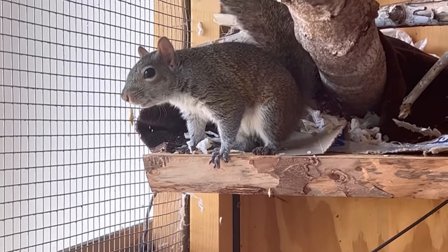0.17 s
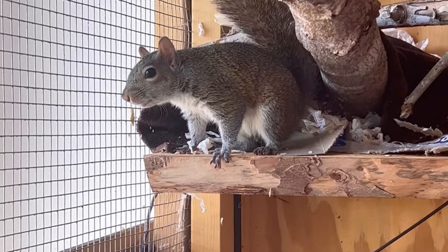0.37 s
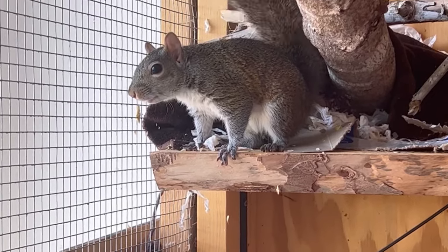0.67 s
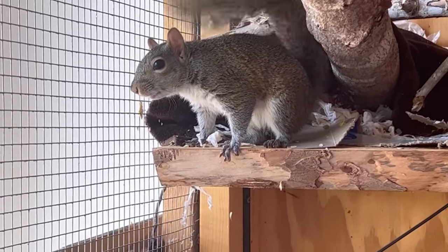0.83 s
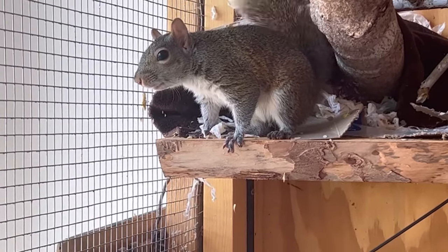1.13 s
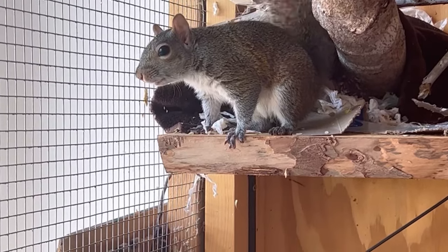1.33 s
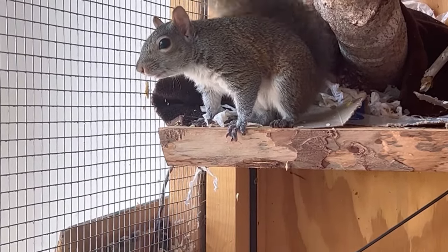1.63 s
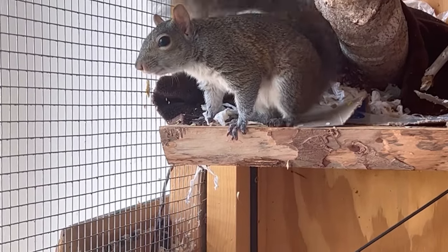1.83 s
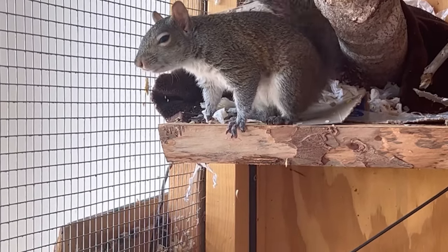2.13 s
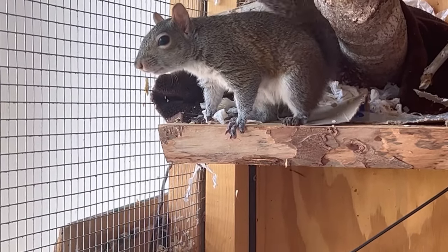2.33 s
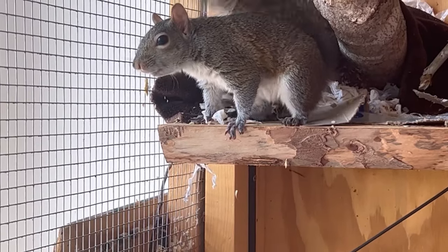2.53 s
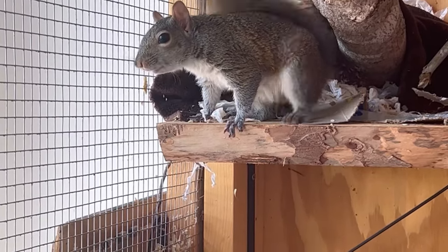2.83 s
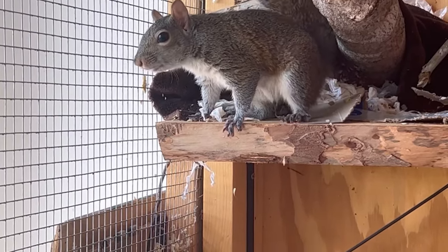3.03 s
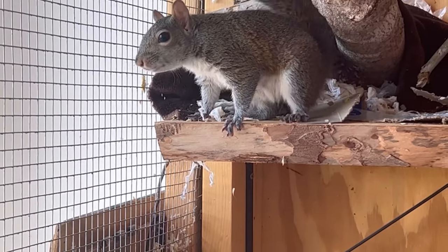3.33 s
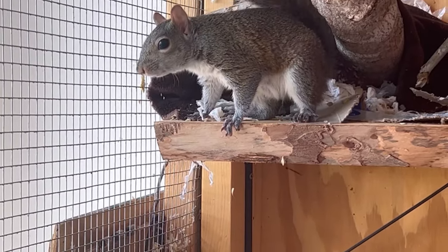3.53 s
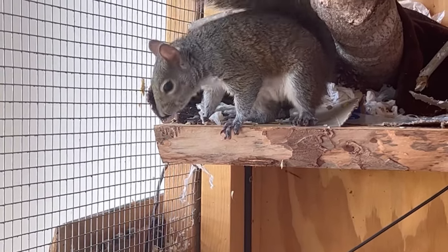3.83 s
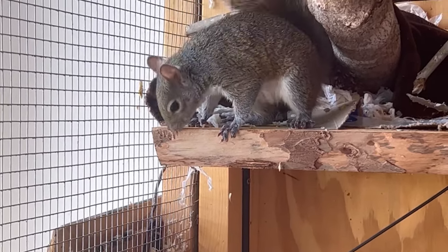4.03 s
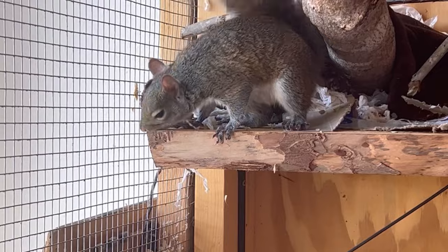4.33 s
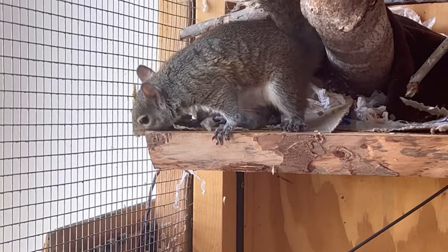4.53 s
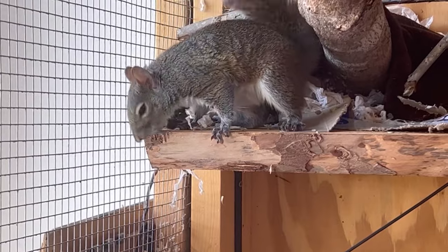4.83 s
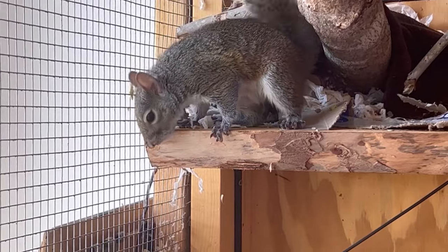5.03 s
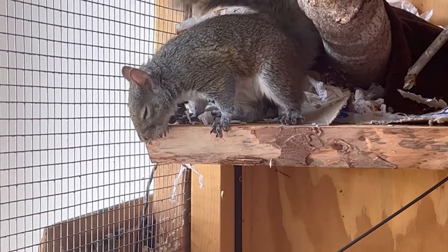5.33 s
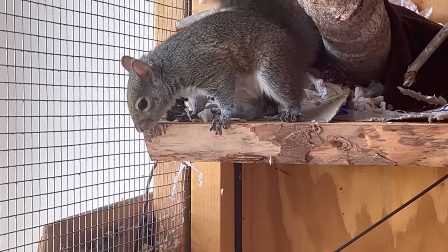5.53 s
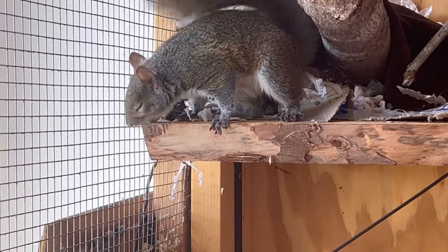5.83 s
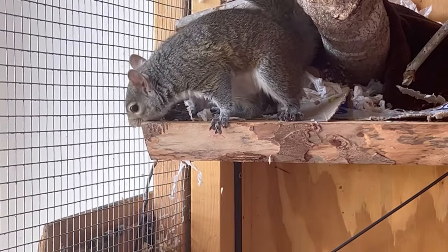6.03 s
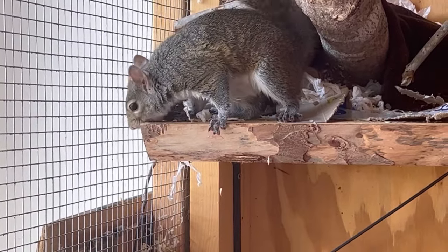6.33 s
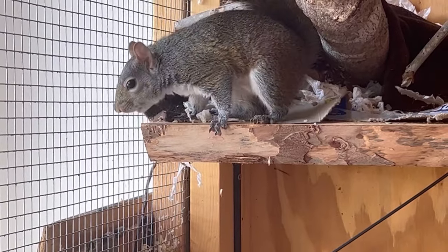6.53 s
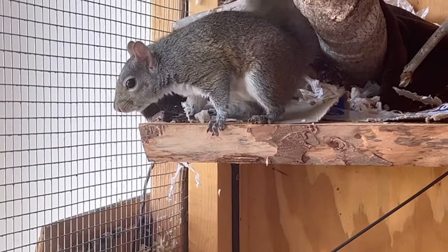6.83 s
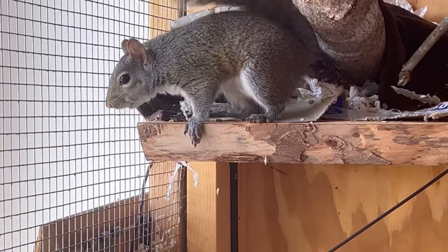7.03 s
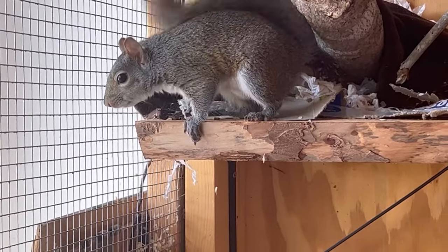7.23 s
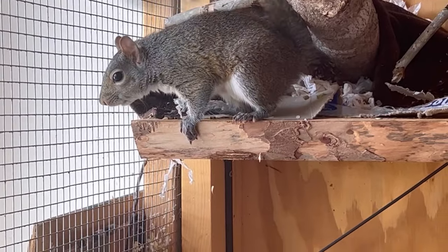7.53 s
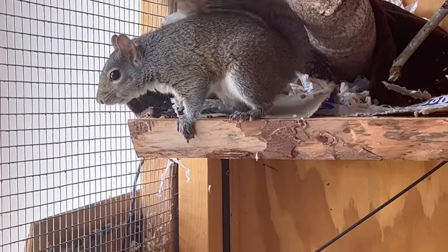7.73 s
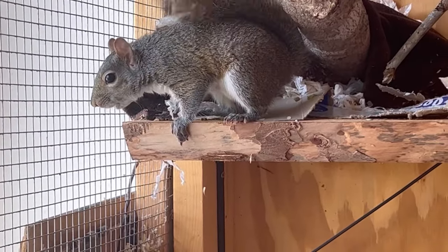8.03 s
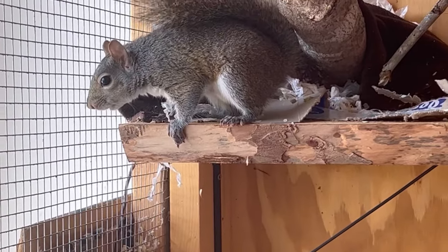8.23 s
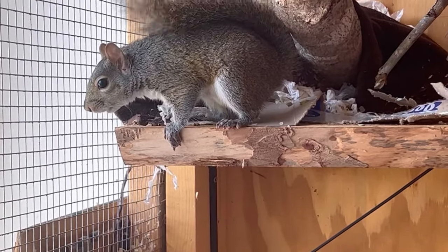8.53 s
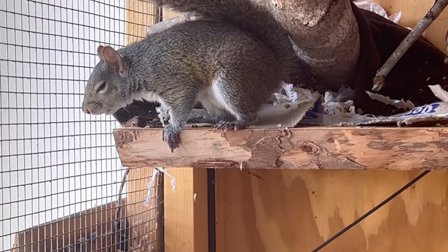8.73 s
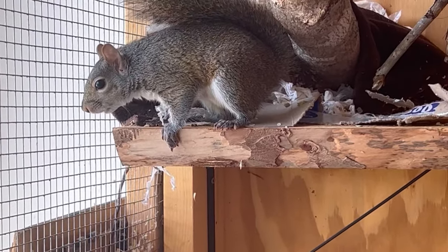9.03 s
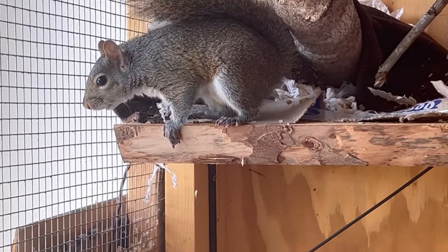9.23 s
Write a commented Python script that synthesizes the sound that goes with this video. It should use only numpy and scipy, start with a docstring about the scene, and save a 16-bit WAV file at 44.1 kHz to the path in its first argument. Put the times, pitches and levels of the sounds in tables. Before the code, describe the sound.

Short raspy squirrel barks at a steady pace, then sparser ones and a harsh hissing screech, with stuttering sniffs and faint rustling in a wooden enclosure.

```python
"""A squirrel on a wooden shelf in a wire enclosure, close to two microphone ports.
It gives ten quick hoarse barks, four spaced ones and a longer rising screech: trembling tones and
fluttering turbulence. Around them it stutters soft nasal puffs, shifts its claws and paws on the plank
and rustles its bedding, all made from short bursts or swells of shaped noise.
The enclosure adds echoes, a woody ring and a tail; a low wavering hum and faint air lie under everything."""
import sys
import numpy as np
from scipy import signal
from scipy.fft import rfft, irfft, next_fast_len
from scipy.io import wavfile
from scipy.ndimage import map_coordinates

SR = 44100
rng = np.random.default_rng(int(sys.argv[2]) if len(sys.argv) > 2 else 0)


def dump_mix(stems):
    """Bounce the given channels to the path in sys.argv[1] as a 16-bit WAV at rate SR."""
    frames = np.atleast_2d(stems).T  # one column per channel
    limited = np.clip(frames, -1, 1)  # hard clip at full scale
    pcm = np.round(limited * 32767).astype(np.int16)
    wavfile.write(sys.argv[1], SR, pcm)


N = 413658


def amp(db):
    """Decibels to gain."""
    return 10 ** (np.asarray(db) / 20)


def evened(x):
    """Scales to rms 1."""
    return x / np.sqrt(np.mean(x ** 2) + 1e-20)


def read(points, hz):
    """Reads a table of (Hz, value) on a log-frequency axis."""
    f, value = np.transpose(points)
    return np.interp(np.log(hz + 1), np.log(f + 1), value)


def add(mix, s, sound):
    """Mixes a sound in at time s."""
    part = mix[max(round(s * SR), 0):][:len(sound)]
    part += sound[:len(part)]


def colour(x, spectrum):
    """Filters by a spectrum in dB."""
    n = x.shape[-1]
    size = next_fast_len(n)
    gain = amp(read(spectrum, np.fft.rfftfreq(size, 1 / SR)))
    return irfft(rfft(x, size) * gain, size)[..., :n]


def noise(spectrum, n):
    """Turbulence of rms 1 with the given spectrum."""
    return evened(colour(rng.standard_normal(n), spectrum))


def sliding(spectrum, factor):
    """Turbulence read at a changing speed, so its resonances all slide by a curve of factors."""
    n = len(factor)
    return map_coordinates(noise(spectrum, 2 * n), [np.cumsum(factor)], order=5, mode="wrap")


def varied(spectrum, depth_db):
    """Nose and throat twitch, so their resonances differ from call to call."""
    hz = np.arange(0, SR / 2, 330)
    return np.transpose([hz, read(spectrum, hz) + depth_db * rng.standard_normal(len(hz))])


def envelope(t, onset_db, attack, hold, fall_db):
    """A gain that climbs from onset_db to full over the attack and falls steadily once t passes hold."""
    climb = onset_db * np.maximum(1 - t / attack, 0) ** 2
    fall = fall_db * np.maximum(t - hold, 0)
    return amp(climb - fall)


def wander(n, hz):
    """A smooth random curve of rms 1 whose movement thins out above about hz."""
    size = next_fast_len(n)
    smoothing = np.exp(-(np.fft.rfftfreq(size, 1 / SR) / hz) ** 2)
    return evened(irfft(rfft(rng.standard_normal(size)) * smoothing, size)[:n])


def whistle(hz, jitter, jitter_hz, shimmer, partials):
    """An unsteady throat tone: pitch and strength both tremble."""
    n = len(hz)
    turns = np.cumsum(hz * (1 + jitter * wander(n, jitter_hz))) / SR
    tone = np.zeros(n)
    for factor, db in partials:
        strength = 1 + shimmer * wander(n, jitter_hz)
        tone += amp(db) * evened(np.sin(2 * np.pi * factor * turns) * strength)
    return tone


def flutter(n, rate_hz, depth):
    """Slack folds pulse the air stream at an uneven rate."""
    turns = np.cumsum(rate_hz * (1 + .35 * wander(n, 200))) / SR
    return evened(np.exp(depth * np.cos(2 * np.pi * turns)))


def burst(spectrum, rise, decay):
    """A short swell of turbulence under an envelope that peaks at 1; rise and decay in seconds."""
    t = np.arange(SR // 5) / SR
    shape = (1 - np.exp(-t / rise)) ** 2 * np.exp(-t / max(decay, .001))
    return noise(spectrum, len(t)) * shape / shape.max()


# Spectra of the mouth puff, lip pop, throat rasp and bark hiss.
# Each row: frequency in Hz, relative level in dB.
PUFF_SPECTRUM = [(120, -33.5), (260, -10), (400, -4), (520, -2), (635, -1.5), (760, -2), (1000, 1.5),
                 (1350, -1.5), (1800, -6), (3000, -33), (6000, -56.5)]
LIP_POP_SPECTRUM = [(450, -25), (930, -3), (1150, -5), (1500, -17.5), (3000, -36)]
RASP_SPECTRUM = [(400, -34), (900, -10), (1450, -4.5), (1900, 1), (2250, 1.5), (2620, 2.5), (3300, -5),
                 (4000, -10.5), (4800, -11.5), (7000, -36.5)]
BARK_HISS_SPECTRUM = [(3000, -37.5), (4900, -18.5), (5500, -4.5), (6600, -8.5), (8400, -1), (9200, -7),
                      (9750, -19), (10500, -1), (11900, 7), (13200, 3.5), (14500, -18.5), (16000, -15)]
# Partials of the hoarse voice. Each row: factor on the throat pitch, level in dB.
VOICE_PARTIALS = [(.25, -25), (.49, -23), (.74, -16.5), (1, 0), (1.45, -13), (1.74, -14.5), (1.95, -20)]
# How each part follows effort: dB at effort 0, dB per dB of effort; the edge is the hiss gain from 13 kHz up
VOICE_LAW, PUFF_LAW, POP_LAW = (-29.7, 1.05), (-39.5, 0.31), (-42.2, 0.31)
RASP_LAW, EDGE_LAW = (-35, 0.84), (.5, 0.8)
# Attack and hold are shares of the bark's length, the fall is in dB per length
PUFF_SHAPE = dict(onset_db=-9, attack=0.087, hold=0.76, fall_db=48.5)
VOICE_SHAPE = dict(onset_db=-19, attack=0.47, hold=0.69, fall_db=40.5)
RASP_SHAPE = dict(onset_db=-18, attack=0.78, hold=0.89, fall_db=38.5)
BARK_HISS_SHAPE = dict(onset_db=-7, attack=1.0, hold=0.87, fall_db=52)
PITCH_RISE = .2  # share of the pitch gained over the length of a bark
# The mouth's resonances start high and settle as it opens: factors, and time constant as a share of length
MOUTH_START, MOUTH_OPEN, MOUTH_SETTLE = 1.4, .85, .19


def bark(length, pitch_hz, effort_db, hiss_db):
    """The mouth pops open with a dull puff; the hoarse voice swells and rises, with rasp and hiss over it."""
    t = np.arange(SR // 7) / SR
    n, share = len(t), t / length
    laws = (VOICE_LAW, PUFF_LAW, POP_LAW, RASP_LAW, EDGE_LAW)
    voice_db, puff_db, pop_db, rasp_db, edge_db = (db + slope * effort_db for db, slope in laws)
    glide = 1 + PITCH_RISE * (share - .5)
    mouth = MOUTH_OPEN + (MOUTH_START - MOUTH_OPEN) * np.exp(-share / MOUTH_SETTLE)

    puff = amp(puff_db) * envelope(share, **PUFF_SHAPE) * sliding(PUFF_SPECTRUM, mouth)
    pop = amp(pop_db) * burst(LIP_POP_SPECTRUM, rise=0.0022, decay=0.0059)[:n]
    # the throat never shapes two barks alike
    throat = sliding(varied(RASP_SPECTRUM, depth_db=4.5), glide ** 1.4)
    rasp = amp(rasp_db) * envelope(share, **RASP_SHAPE) * throat
    # the highest hiss fades in the weaker barks
    fizz = colour(sliding(varied(BARK_HISS_SPECTRUM, depth_db=2), mouth ** 0.1), [(9500, 0), (13000, edge_db)])
    hiss = amp(hiss_db) * envelope(share, **BARK_HISS_SHAPE) * fizz
    tone = whistle(pitch_hz * glide, jitter=.03, jitter_hz=330, shimmer=0.52, partials=VOICE_PARTIALS)
    voice = amp(voice_db) * envelope(share, **VOICE_SHAPE) * tone

    breath = (puff + rasp + hiss) * flutter(n, rate_hz=330, depth=0.32)
    soft_start = 1 - np.exp(-t / 0.0008)
    return pop + (breath + voice) * soft_start


# Spectrum of the screech's hiss. Each row: frequency in Hz, relative level in dB.
SCREECH_HISS_SPECTRUM = [(3000, -33), (3900, -11), (4450, -8), (4950, -13), (5330, 3.5), (5550, -3.5),
                         (5850, 7), (6200, -2.5), (6800, 0), (7700, -6.5), (9500, -13), (10800, 0),
                         (11800, -2), (13000, -24), (16000, -31.5)]
# Pitch path of the screech. Each row: scene time in seconds, lower whistle in Hz, upper whistle in Hz.
SCREECH_PITCH_PATH = [(7.895, 1441, 2050), (7.926, 1315, 1990), (7.993, 1465, 2125), (8.014, 1606, 2297),
                      (8.056, 1770, 2320), (8.085, 1872, 2665)]
SCREECH_S, SCREECH_LENGTH_S, SCREECH_CLOSE_S = 7.895, .205, 0.016
# Levels before the envelopes
SCREECH_RASP_DB, SCREECH_HISS_DB, LOW_WHISTLE_DB, HIGH_WHISTLE_DB = -40, -29, -40, -30
# Attack and hold in seconds, the fall in dB per second
SCREECH_RASP_SHAPE = dict(onset_db=-19.5, attack=.045, hold=0.094, fall_db=88)
SCREECH_HISS_SHAPE = dict(onset_db=-33, attack=0.052, hold=.132, fall_db=306.5)
LOW_WHISTLE_SHAPE = dict(onset_db=-12.5, attack=.06, hold=0.087, fall_db=229.5)
HIGH_WHISTLE_SHAPE = dict(onset_db=-29, attack=.108, hold=0.14, fall_db=286.5)


def screech():
    """Two rising whistles, made hoarse by fluttering folds, in a strong hiss; the upper whistle takes over."""
    t = np.arange(SR // 4) / SR
    n = len(t)
    s, *pitches = np.transpose(SCREECH_PITCH_PATH)
    low_hz, high_hz = (np.interp(SCREECH_S + t, s, hz) for hz in pitches)

    throat = noise(RASP_SPECTRUM, n) + amp(-7.5) * noise(PUFF_SPECTRUM, n)
    rasp = amp(SCREECH_RASP_DB) * envelope(t, **SCREECH_RASP_SHAPE) * throat
    hiss = amp(SCREECH_HISS_DB) * envelope(t, **SCREECH_HISS_SHAPE) * noise(SCREECH_HISS_SPECTRUM, n)
    tones = np.zeros(n)
    for hz, db, shape in [(low_hz, LOW_WHISTLE_DB, LOW_WHISTLE_SHAPE),
                          (high_hz, HIGH_WHISTLE_DB, HIGH_WHISTLE_SHAPE)]:
        tone = whistle(hz, jitter=0.014, jitter_hz=247, shimmer=.35, partials=[(1, 0), (2, -21.5)])
        tones += amp(db) * envelope(t, **shape) * tone

    hoarse = tones * flutter(n, rate_hz=250, depth=0.16)
    breath = (rasp + hiss) * flutter(n, rate_hz=110, depth=0.23)
    closing = np.clip((SCREECH_LENGTH_S - t) / SCREECH_CLOSE_S, 0, 1)
    return (breath + hoarse) * closing


# Spectra of the nostril hiss and the low push. Each row: frequency in Hz, relative level in dB.
NOSTRIL_SPECTRUM = [(1200, -17), (2500, -13.5), (3800, 3.5), (4900, -4), (5800, -1), (7000, -8),
                    (8400, 1.5), (9800, -17), (11900, 13.5), (13300, -5.5), (16000, -13.5)]
LOW_PUSH_SPECTRUM = [(120, -18.5), (260, 0.5), (400, 3), (560, 1), (680, -9.5), (1000, -5), (1700, -20),
                     (3000, -23), (6000, -44)]
# Bouts of nasal puffs. Each row: first puff in seconds, number of puffs, period in seconds,
# mid-bout hiss in dB, mid-bout low push in dB, growth over the bout in dB, decay of the hiss in seconds.
PUFF_BOUTS = [(0.0263, 6, 0.04, -47.5, -50.5, -9.5, 0.005), (0.653, 5, 0.035, -51, -55, -1, 0.0042),
              (0.8339, 4, .0398, -54.5, -61, 4, 0.011), (4.655, 7, 0.032, -56.5, -56, 11.5, 0.0076),
              (4.907, 4, 0.034, -54.5, -52.5, 6, 0.0082), (5.1132, 4, 0.037, -60, -56.5, 1.5, .007),
              (5.334, 5, 0.042, -58, -55, -1, .0075), (7.7502, 4, .042, -43.5, -43, 4, 0.0093),
              (8.4426, 6, 0.037, -51, -55, -5.5, 0.012), (8.732, 4, 0.037, -52.5, -58.5, 9.5, 0.0095),
              (9.3253, 2, 0.037, -51, -48, 9, 0.0072)]
ARCH_DB, LOW_PUSH_SHARE = 7, 0.93  # weakening towards a bout's ends; share of force the low push follows


def puffs():
    """Evenly paced bouts, arched and leaning in force: nostril hiss over a soft low push of air."""
    out = np.zeros(N)
    for start, count, period, hiss_db, low_db, growth_db, decay in PUFF_BOUTS:
        for k in range(round(count)):
            from_middle = (k + .5) / round(count) - .5
            force_db = growth_db * from_middle - ARCH_DB * (2 * from_middle) ** 2
            nostrils = burst(varied(NOSTRIL_SPECTRUM, depth_db=6.5), rise=0.0011, decay=decay)
            hiss = amp(hiss_db + force_db) * nostrils
            low = burst(LOW_PUSH_SPECTRUM, rise=0.0014, decay=decay + 0.002)
            push = amp(low_db + LOW_PUSH_SHARE * force_db) * low
            add(out, start + k * period, hiss + push)
    return out


# Spectra of claws and of the plank. Each row: frequency in Hz, relative level in dB.
CLAW_SPECTRUM = [(300, -17), (1200, -13.5), (3000, -12.5), (6000, -8), (9500, -2), (12000, 1), (16000, 2)]
PLANK_SPECTRUM = [(70, -10.5), (165, 8), (210, -6), (265, 12), (350, -5), (450, -8), (700, -10.5),
                  (1500, -25.5), (4000, -35), (9000, -54.5)]
# Claws on wood and wire. Each row: start in seconds, reference level in dB, decay of the scrape in seconds.
CLAW_HITS = [(2.3714, -46.5, .005), (2.4047, -39, 0.0076), (2.5023, -50.5, .005), (3.095, -46, 0.0083),
             (6.197, -55, .005), (6.288, -57.5, .005), (6.417, -55.5, .009), (6.9345, -37, 0.021),
             (7.541, -42, 0.011), (7.568, -29, 0.016), (7.651, -45, 0.025)]
# Paws bumping the plank. Each row: start in seconds, level in dB, decay in seconds.
PAW_BUMPS = [(4.446, -54.5, 0.011), (4.483, -57.5, 0.017), (5.836, -50.5, 0.017), (5.872, -56, 0.011),
             (6.238, -53, 0.037), (6.27, -53, 0.021), (6.346, -51, 0.037), (6.419, -43, 0.02),
             (7.568, -58.5, 0.061), (7.791, -57, 0.011)]


def feet():
    """Claws snap and scrape briefly; paws thud on the shelf."""
    out = np.zeros(N)
    for s, db, decay in CLAW_HITS:
        snap = amp(db + 3.5) * burst(CLAW_SPECTRUM, rise=.0001, decay=0.00071)
        scrape = amp(db - 8.0) * burst(CLAW_SPECTRUM, rise=0.00067, decay=decay)
        add(out, s, snap + scrape)
    for s, db, decay in PAW_BUMPS:
        add(out, s, amp(db) * burst(PLANK_SPECTRUM, rise=0.0024, decay=decay))
    return out


# Spectrum of the rustle. Each row: frequency in Hz, relative level in dB.
BEDDING_SPECTRUM = [(90, -21), (160, 4), (280, 6), (450, -9.5), (800, -17.5), (1600, -25), (4000, -37.5)]
# The squirrel leans. Each row: loudest moment in seconds, half length in seconds, level in dB.
LEAN_SWELLS = [(0.027, 0.19, -57.5), (.77, 0.22, -62), (4.77, 0.19, -59), (5.417, 0.29, -65),
               (5.88, .09, -68), (6.37, .13, -66), (8.6, 0.18, -68.5), (9.36, 0.045, -57.5)]


def bedding():
    """Shredded paper and fur rub softly as the squirrel leans."""
    t = np.arange(N) / SR
    rubbing = np.zeros(N)
    for s, half, db in LEAN_SWELLS:
        rubbing += amp(db) / np.cosh(np.clip(2 * (t - s) / half, -20, 20))
    unevenness = amp(1.9 * wander(N, 30))
    return noise(BEDDING_SPECTRUM, N) * rubbing * unevenness


# Part of diffuse sound that is opposite at the two ports. Each row: frequency in Hz, level in dB.
PORT_SPREAD = [(60, -31), (150, -14), (400, -4), (600, -1), (900, 2.5), (2500, -35.5), (4200, -23),
               (5000, -3), (6200, -20.5), (8000, -11.5), (10000, 3.5), (13000, -21)]


def diffuse(common, apart):
    """Sound from all sides: alike at both ports except in some bands."""
    side = colour(apart, PORT_SPREAD)
    return np.array([common + side, common - side])


# Decay of the enclosure. Each row: frequency in Hz, time to fall by 60 dB in seconds.
TAIL_T60 = [(200, 0.37), (900, 0.37), (2000, 0.45), (4000, 0.2468), (8000, 0.3357), (12000, 0.2),
            (16000, 0.42)]
# Colour of the tail. Each row: frequency in Hz, gain in dB.
TAIL_SPECTRUM = [(200, -6), (1300, -13.5), (1900, -16), (2400, -13.5), (3300, -10.5), (4600, -12),
                 (5800, -13.5), (8000, -12), (13000, -19)]


def tail():
    """Dense reflections of random sign, each band dying at its own speed."""
    taps = rng.choice([-1., 1.], SR) * (rng.random(SR) < .15)
    hz, t, bands = signal.stft(taps, SR, nperseg=256)
    t60 = read(TAIL_T60, hz)[:, None]
    # the root keeps slow bands from carrying more energy
    fade = amp(-60 * t / t60) * (1 - np.exp(-t / 0.0041)) / np.sqrt(t60)
    ring = signal.istft(bands * fade, SR, nperseg=256)[1][:SR]
    return colour(ring / np.linalg.norm(ring), TAIL_SPECTRUM)


# Nearby boards. Each row: delay in seconds, gain as a factor.
BOARD_ECHOES = [(.0024, 0.11), (.0055, 0.16), (.0087, .18), (0.0131, 0.15)]
# Resonances of the wooden nook. Each row: frequency in Hz, width in Hz, gain as a factor.
NOOK_RESONANCES = [(712, 12, 0.36), (920, 35, 0.23), (1160, 20, 0.48), (1425, 47, 0.38), (1770, 32, 0.43),
                   (2070, 15, 0.33), (2320, 28, 1), (2612, 42, 0.28), (3420, 12, 0.37), (3563, 27, .5),
                   (5400, 33, .5), (5570, 48, 1), (5920, 32, .45)]


def enclosure(x):
    """Direct sound, echoes off the nearest boards, the ring of the nook, then the tail."""
    near = x.copy()
    for delay, gain in BOARD_ECHOES:
        add(near, delay, gain * x)
    t = np.arange(SR // 4) / SR
    ring = np.zeros(len(t))
    for hz, width, gain in NOOK_RESONANCES:
        dying = np.exp(-np.pi * width * t)
        ring += gain * 2 * np.pi * width / SR * dying * np.cos(2 * np.pi * hz * t)
    near += signal.oaconvolve(x, ring)[:N]
    far = signal.fftconvolve(x[None], diffuse(tail(), tail()), axes=1)[:, :N]
    return amp(-1.78) * near + far


# Spectrum of the rumble and air. Each row: frequency in Hz, relative level in dB.
AIR_SPECTRUM = [(15, -31), (35, -22.5), (55, -1.5), (78, -14.5), (130, -11.5), (220, -18.5), (350, -27.5),
                (700, -30.5), (1500, -37), (3500, -50), (6000, -49.5), (10000, -56.5), (13000, -41),
                (16000, -58.5)]
# Low hum. Each row: frequency in Hz, rms wavering in Hz, level before the swell in dB.
HUM_TONES = [(63.7, 5.2, -60.5), (102, 2, -65)]
# Slow level curve of the whole background. Each row: time in seconds, gain in dB.
BACKGROUND_SWELL = [(0, -1), (1.3, -1.5), (2.2, 1.5), (4.8, -2), (7.8, .5), (9.3, -4.5)]
AIR_DB = -61.5  # before the swell


def background():
    """Low rumble, a wavering hum and faint hiss that swell together."""
    air = diffuse(noise(AIR_SPECTRUM, N), noise(AIR_SPECTRUM, N)) * amp(AIR_DB + wander(N, 3))
    hum = np.zeros(N)
    for hz, waver, db in HUM_TONES:
        turns = np.cumsum(hz + waver * wander(N, 12)) / SR
        strength = 1 + 0.31 * wander(N, 8.7)
        hum += amp(db) * evened(np.sin(2 * np.pi * turns) * strength)
    swell_db = np.interp(np.arange(N) / SR, *np.transpose(BACKGROUND_SWELL))
    return (air + hum) * amp(swell_db)


# The barks. Each row: start in seconds, length in seconds, throat pitch at mid-length in Hz,
# effort in dB, hiss level before its envelope in dB.
BARK_CALLS = [(1.467, 0.073, 1702, -6, -29.5), (1.71, 0.067, 1818, -1.5, -27.5),
              (1.975, 0.06, 1815, 1.1, -27.5), (2.217, 0.056, 1785, 0, -28), (2.526, 0.066, 1800, 0.2, -27),
              (2.828, 0.067, 1841, .3, -28), (3.119, .068, 1843, 0.9, -25.5), (3.413, 0.07, 1860, 0, -27.5),
              (3.721, 0.059, 1883, -1.9, -30), (4.044, .062, 1925, -2.6, -30),
              (5.931, 0.064, 1802, -8.5, -36.3), (6.483, 0.055, 1729, -8.5, -30.5),
              (6.96, .07, 1796, -4, -30.5), (7.288, .066, 1785, -2.8, -31)]


def scene():
    """The squirrel's calls and movements in its enclosure, over the background."""
    squirrel = puffs() + feet() + bedding()
    for s, *call in BARK_CALLS:
        add(squirrel, s, bark(*call))
    add(squirrel, SCREECH_S, screech())
    return enclosure(squirrel) + background()


# Phase by which the left port leads the right. Each row: frequency in Hz, lead in radians.
PORT_LEAD = [(200, 0), (400, .25), (750, 0), (4600, 0), (4900, 1.5), (5100, -1.8), (5700, 0), (7200, .05),
             (8800, .8), (9500, .7), (9800, 1.6), (11500, 2.35), (13200, 3), (16000, 3.1)]
EDGE_HZ = 16200  # upper band limit


def record(dry):
    """The two ports differ in phase, mostly in the treble; then a low-pass sets the band limit."""
    size = next_fast_len(N + 4096)
    lead = read(PORT_LEAD, np.fft.rfftfreq(size, 1 / SR))
    turn = np.exp(.5j * np.array([lead, -lead]))  # half the lead to each port
    pair = irfft(rfft(dry, size) * turn, size)[:, :N]
    low_pass = signal.firwin(511, EDGE_HZ, window=("kaiser", 9), fs=SR)
    return signal.oaconvolve(pair, low_pass[None], "same")


dry = scene()
out = record(dry)
dump_mix(out)
```